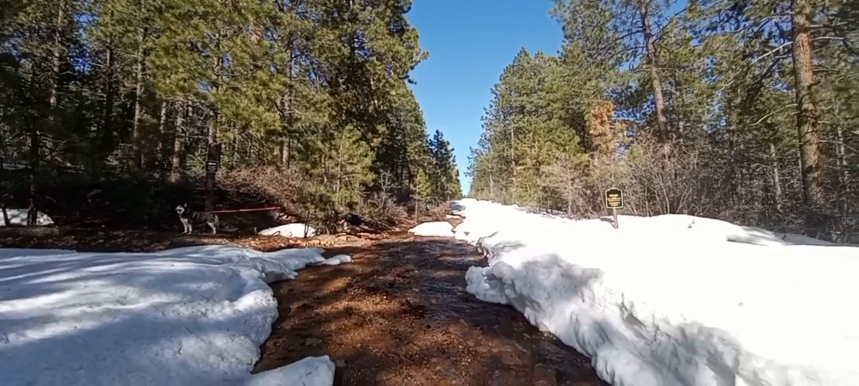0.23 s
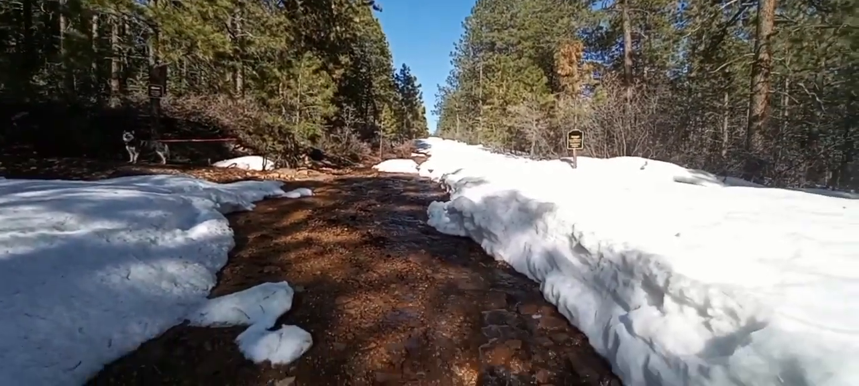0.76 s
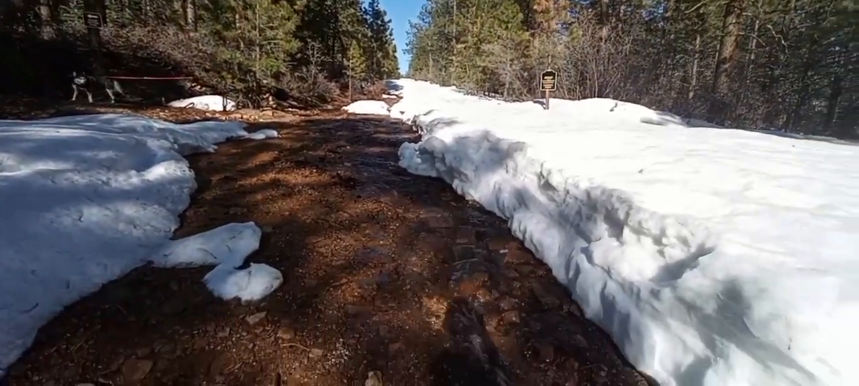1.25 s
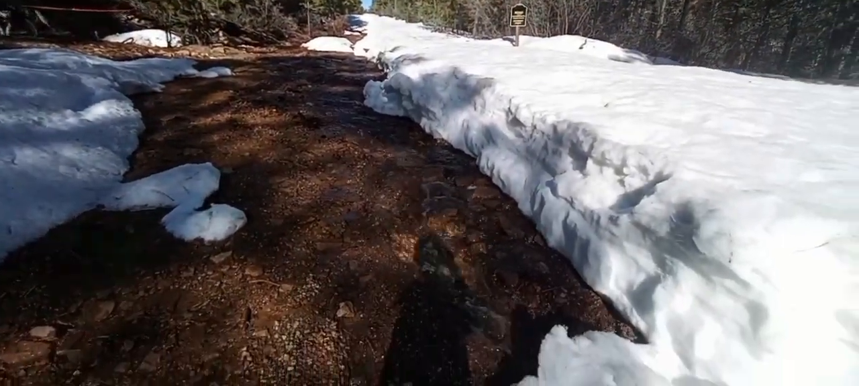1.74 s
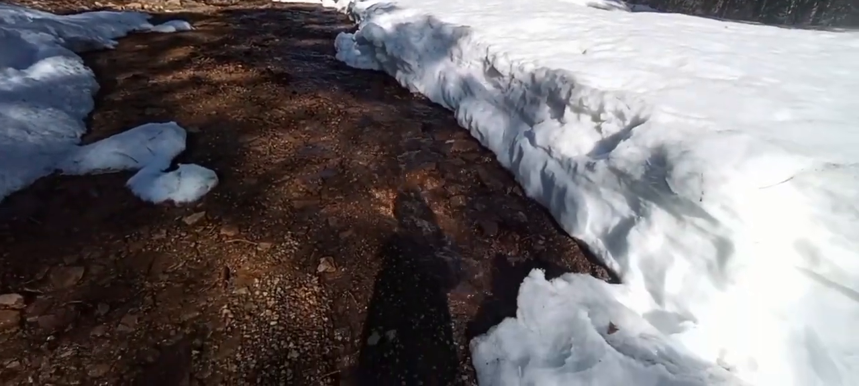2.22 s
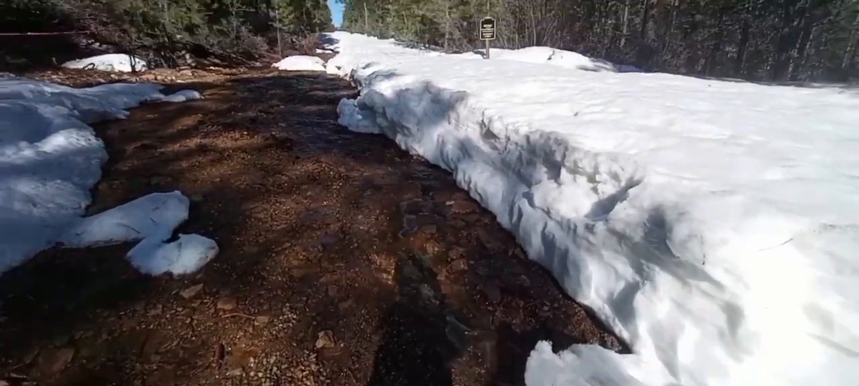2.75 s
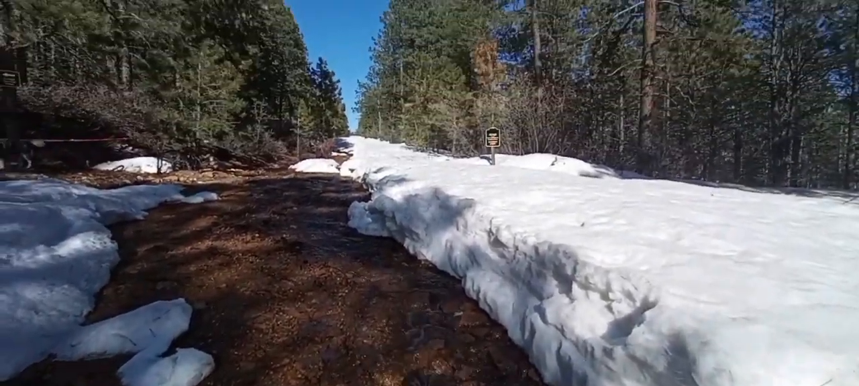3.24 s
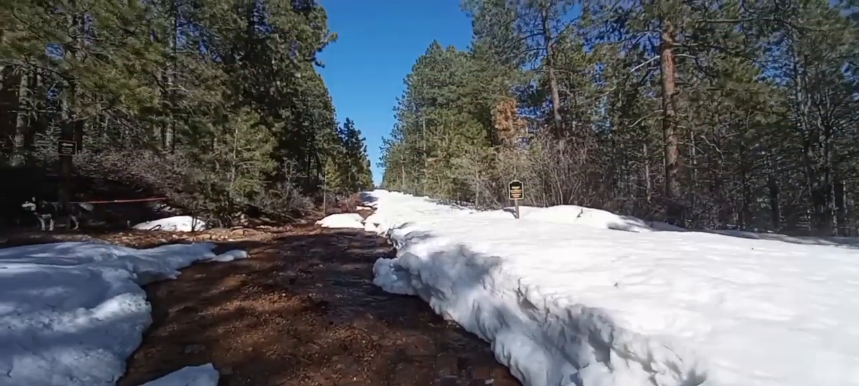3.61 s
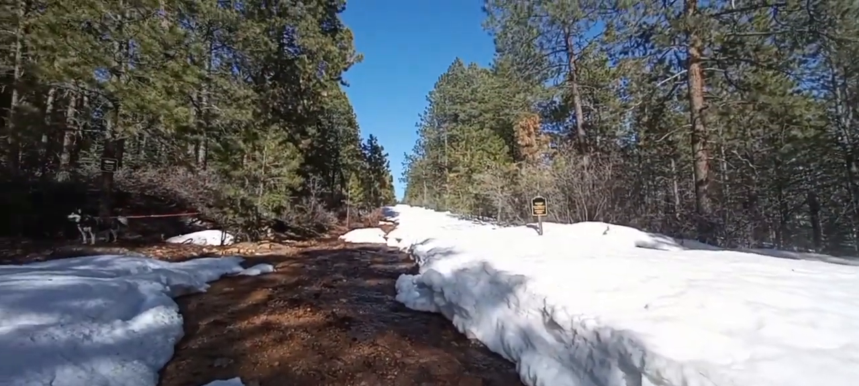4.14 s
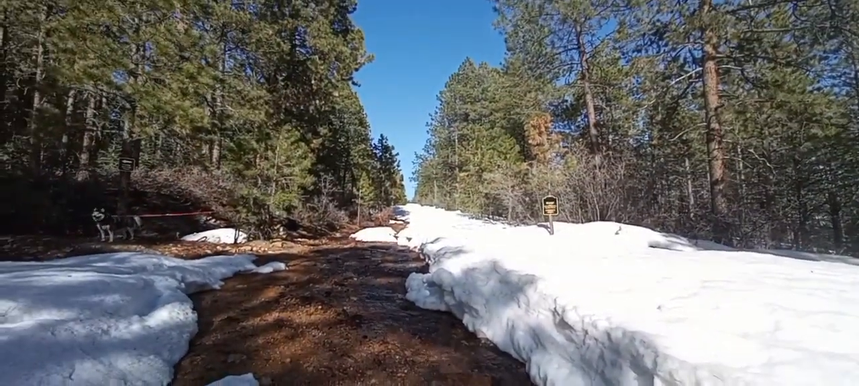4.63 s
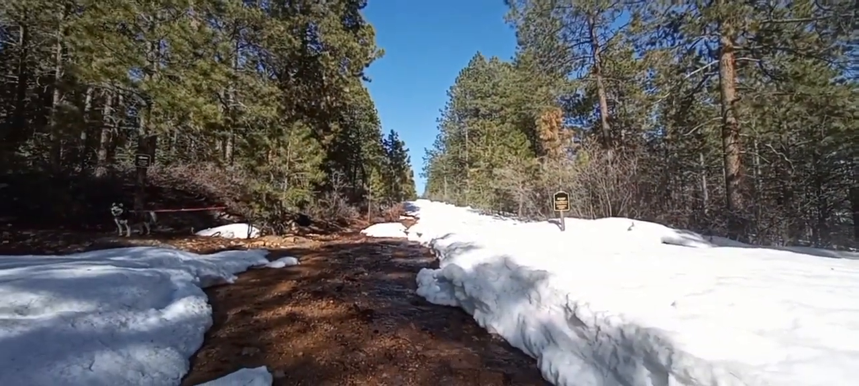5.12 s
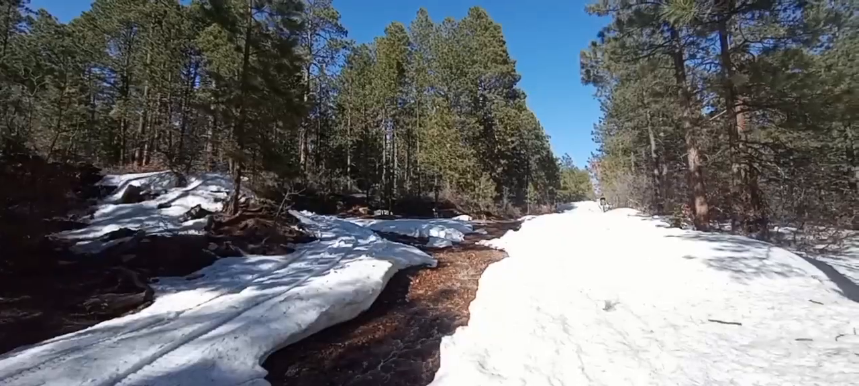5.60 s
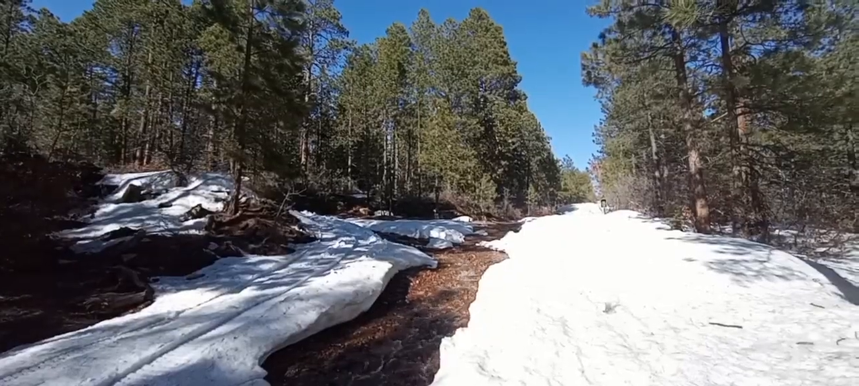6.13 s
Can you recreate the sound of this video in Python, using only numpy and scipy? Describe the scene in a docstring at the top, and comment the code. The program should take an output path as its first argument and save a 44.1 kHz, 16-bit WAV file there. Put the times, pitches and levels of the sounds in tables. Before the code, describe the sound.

Steady rushing water, close and crisp, fills the left side, with a much fainter, wider wash on the right. Small bubbles tick and pop over deeper blurred gurgles, with a few tiny bright splashes. Low wind puffs thump each side separately, heaviest around 4.3 to 4.7 seconds. After an abrupt cut and short silence, the stream rises again at another spot, gurgling more thickly.

```python
"""Snowmelt stream, two ports

Meltwater rushes over gravel between snow banks: a hiss of shaped noise and thousands of damped bubble rings,
with deeper gurgles and near pops as soft-edged gliding tones, and splashes as spits of bright noise.
A small camera hears it through two unlike microphones, the left loud and narrow, the right faint and wide;
puffs of wind thump each port alone. The sound stops dead, then fades in again at another spot on the stream."""
import sys
import numpy as np
from scipy import signal
from scipy.fft import rfft, irfft, next_fast_len
from scipy.io import wavfile
from scipy.ndimage import uniform_filter1d, map_coordinates

SR = 44100
rng = np.random.default_rng(int(sys.argv[2]) if len(sys.argv) > 2 else 0)


def pcm_store(signal):
    """Save signal as 16-bit PCM."""
    levels = np.round(np.clip(np.atleast_2d(signal), -1, 1) * 32767)
    wavfile.write(sys.argv[1], SR, levels.astype(np.int16).T)


def voltage_ratio(decibels):
    """Convert decibels (scalar or array-like) to amplitude ratios, 20 dB per decade."""
    exponent = np.asarray(decibels, float) / 20
    return 10 ** exponent


N = 280917  # samples
STOP_S, RESTART_S = 5.293, 5.692


def unit(x):
    """Scales a sound to rms 1."""
    return x / np.sqrt(np.mean(x ** 2) + 1e-20)


def along(points, hz):
    """Reads a (Hz, value) curve on a log frequency axis."""
    f, v = np.transpose(points)
    return np.interp(np.log(hz + 1), np.log(f + 1), v)


def curves(rows):
    """Draws straight-line automation, one curve for each column after the time."""
    s, *columns = np.transpose(rows)
    return [np.interp(np.arange(N) / SR, s, column) for column in columns]


def wobble(rate):
    """A smooth random curve with rate knots a second."""
    knots = rng.standard_normal(int(N * rate / SR) + 4)
    return map_coordinates(knots, [np.arange(N) * rate / SR])


def bump(s, width_s):
    """A bell in time, 1 at its middle and 1/e at width_s to either side."""
    return np.exp(-((np.arange(N) / SR - s) / width_s) ** 2)


def filtered(x, response):
    """Filters x by a (possibly complex) response of frequency."""
    m = next_fast_len(N + 8192)
    return irfft(rfft(x, m) * response(np.fft.rfftfreq(m, 1 / SR)), m)[..., :N]


def below(cut_hz, power):
    """A low-pass response, half amplitude at cut_hz."""
    return lambda hz: 1 / (1 + (hz / cut_hz) ** power)


def above(cut_hz, power):
    """A high-pass response, about half amplitude at cut_hz."""
    return lambda hz: 1 / (1 + (cut_hz / (hz + 1)) ** power)


def add(track, s, sound):
    """Adds a short sound centred on time s."""
    start = max(round(s * SR) - len(sound) // 2, 0)
    track[start:][:len(sound)] += sound


def swell(hz, ms, rise):
    """A bell-shaped tone, ms wide at half level, gliding by the share rise of its pitch over that width."""
    half = round(ms * SR / 500)
    u = np.arange(-half, half) * 1000 / (SR * ms)  # time in widths
    turns = hz * ms / 1000 * (u + rise * u ** 2 / 2)
    return np.exp(-2.77 * u ** 2) * np.sin(2 * np.pi * (turns + rng.random()))


def late(x):
    """Delays what the left microphone hears after the right."""
    lag_s = 0.001283
    return filtered(x, lambda hz: np.exp(-2j * np.pi * hz * lag_s))


def hiss(patchy_db, deep_db):
    """Far water: white noise with time-frequency patches of random gain, deeper in the low murmur."""
    hz, _, z = signal.stft(rng.standard_normal(N), SR, nperseg=512)
    patches = uniform_filter1d(rng.standard_normal(z.shape), size=6, axis=0)
    patches = uniform_filter1d(patches, size=14, axis=1)
    depth_db = patchy_db + deep_db / (1 + (hz[:, None] / 900) ** 2)
    _, sound = signal.istft(z * voltage_ratio(depth_db * unit(patches)), nperseg=512)
    return unit(sound[:N])


def bubbles(count, lo_hz, hi_hz, cycles, spread_db, size):
    """Near water: damped rings with a soft start and rising pitch, a few much louder than the rest."""
    at, pitch, luck = rng.random((count, 3)).T[:, :, None]
    hz = lo_hz + (hi_hz - lo_hz) * pitch
    u = np.arange(size) / SR * hz / cycles  # age in lives, one life being so many cycles
    gain = np.sqrt(hz) * voltage_ratio(np.minimum(-spread_db * np.log(luck), 11.5))
    ring = gain * u * np.exp(-2 * u) * np.sin(2 * np.pi * cycles * u * (1 + 0.0593 * u))
    where = (at * N).astype(int) + np.arange(size)
    return np.bincount(where.ravel(), ring.ravel(), N + size)[:N]


def water():
    """Far hiss under short small bubbles, long-ringing small bubbles and large bubbles."""
    small = bubbles(count=30000, lo_hz=1566, hi_hz=15330, cycles=3.4, spread_db=5.0, size=220)
    ringing = bubbles(count=2500, lo_hz=1402.0, hi_hz=12070, cycles=19.8, spread_db=4.5, size=1200)
    large = bubbles(count=900, lo_hz=171.2, hi_hz=1623, cycles=5.76, spread_db=1.5, size=2600)
    far = hiss(patchy_db=1.5, deep_db=3.0)
    return unit(far + 0.5 * unit(small) + 0.36 * unit(ringing) + 0.17 * unit(large))


# how alike the two microphones hear the water: f/Hz, likeness/0-1
ALIKE = [(150, 0.1), (200, 0.74), (600, 0.4), (1000, 0.23), (1450, 0.52), (2000, 0.4), (2400, 1),
         (3000, 0.39), (5300, 0.02), (7000, 0)]


def water_at_ports():
    """Part of the water reaches both microphones, the rest only one; the shared murmur swells near gurgles."""
    calm_db, swell_db, reach_s = -0.55, 6, 0.2
    likeness = lambda hz: np.clip(along(ALIKE, hz), 0, 1)
    shared = filtered(water(), lambda hz: np.sqrt(likeness(hz)))
    churn = np.tanh(sum(bump(row[0], reach_s) for row in GURGLES) / 3)  # how thickly gurgles lie
    murmur = filtered(shared, below(550, 4))
    shared = shared + (voltage_ratio(calm_db + swell_db * churn) - 1) * murmur
    left, right = [filtered(water(), lambda hz: np.sqrt(1 - likeness(hz))) for _ in "LR"]
    return left + late(shared), right + shared


# colour of the water at the left microphone, before and after the stop: f/Hz, relative level/dB
LEFT_FIRST = [(150, -17), (200, -14), (500, -15), (1150, -11), (1450, -1.5), (1900, 1), (3900, -1),
              (5300, 5.5), (6000, 2.5), (6600, -10), (7600, -28), (8500, -46), (9500, -32.5), (11000, -52),
              (15200, -46)]
LEFT_SECOND = [(200, -12), (500, -13), (1000, -11.5), (1450, -2), (1900, 1.5), (3500, -1), (5000, 1.5),
               (6300, 4.5), (7000, -7), (7700, -18), (8500, -42), (9300, -44.5), (10500, -33), (12000, -37),
               (15200, -34.5)]
# the camera swings along the stream:
# t/s, level of the left body before its top is raised or lowered/dB, aim/0 broadside to 1 end-on
CAMERA = [(0, -26.5, 0.047), (.6, -27, .15), (1.6, -27.5, 0.12), (2.0, -28, 0), (2.5, -27.5, .15),
          (3.0, -26, .8), (3.25, -26.5, .5), (3.9, -26.5, 0.91), (4.5, -27, 0.68), (5.0, -25.5, 0.63),
          (5.29, -26, 0.92), (5.7, -28.5, .3), (5.8, -26.5, .1), (5.92, -27.5, 0.37), (6.2, -29, 0.2),
          (6.37, -29, 0)]


def left_port(water_left):
    """The loud, narrow microphone: a body and a fizz split near 4.5 kHz, balanced by the camera's aim."""
    fizz_db, fizz_aim_db = -34, 7  # broadside, gain end-on
    upper_db, upper_aim_db = 3.5, -6.5  # top of the body broadside, change end-on
    body_db, aim = curves(CAMERA)
    low, thin = below(4500, 8), above(150, 5)  # thin: the water has no deep bass
    high = lambda hz: 1 - low(hz)

    def coloured(points, part):
        return unit(filtered(water_left, lambda hz: voltage_ratio(along(points, hz)) * part(hz) * thin(hz)))

    first = np.arange(N) < STOP_S * SR
    body = np.where(first, coloured(LEFT_FIRST, low), coloured(LEFT_SECOND, low))
    fizz = np.where(first, coloured(LEFT_FIRST, high), coloured(LEFT_SECOND, high))
    upper = filtered(body, above(2800, 6))
    body = body + (voltage_ratio(upper_db + upper_aim_db * aim) - 1) * upper
    flutter_db = 0.8 * wobble(11)
    return voltage_ratio(body_db) * body + voltage_ratio(fizz_db + fizz_aim_db * aim + flutter_db) * fizz


# colour of the water at the right microphone: f/Hz, relative level/dB
RIGHT_COLOUR = [(150, -22), (200, -23.5), (500, -23.5), (1150, -21.5), (1380, -17.5), (2000, -23),
                (4000, -30.5), (6500, -28), (8000, -28), (9500, -25), (11800, -33.5), (12400, -39),
                (13800, -33.5), (14300, -35.5), (15300, -29)]


def right_port(water_right):
    """The faint, wide microphone: one broad colour and a level that drifts at random."""
    thin = above(150, 5)
    wide = unit(filtered(water_right, lambda hz: voltage_ratio(along(RIGHT_COLOUR, hz)) * thin(hz)))
    return voltage_ratio(-45 + 0.7 * wobble(2.5) + 0.55 * wobble(12)) * wide


# brief lulls of the flow: t/s, level change/dB
LULLS = [(.62, -7.5), (3.803, -4.5)]


def stream():
    """The running water at both ports, rising and falling together with random surges and lulls."""
    lull_s = 0.013  # half width
    water_left, water_right = water_at_ports()
    surge_db = 0.44 * wobble(4.2) + 0.5 * wobble(22.05)
    surge_db = surge_db + sum(db * bump(s, lull_s) for s, db in LULLS)
    return voltage_ratio(surge_db) * np.array([left_port(water_left), right_port(water_right)])


# colour of the steady buffeting and of the bursts: f/Hz, relative level/dB
BUFFET = [(20, -23), (50, -10.5), (95, -3.5), (150, -9), (210, -9), (280, -35), (400, -65.5)]
BURST = [(15, -41), (45, 0), (100, 0.5), (200, 1.5), (270, -30.5), (450, -59.5)]
# rms of the buffeting between gusts, one row for left and one for right: level/dB
CALM_DB = [
    [-66.5],
    [-78],
]
# gusts added to the calm strength: middle t/s, length/s, left level/dB, right level/dB
GUSTS = [(0.88, .2, -62, -57), (1.228, 0.097, -52, -59), (1.8, 0.18, -59, -62), (2.04, 0.43, -60, -64),
         (2.237, 0.13, -75, -61), (2.58, .15, -62, -74), (3.55, 0.27, -67, -70), (4.35, 0.21, -43, -53),
         (4.65, 0.28, -45, -56), (5.117, 0.39, -63.5, -59.5), (6.3, 0.22, -63.5, -62.5)]
# wind thumps: t/s, port/0 left 1 right, f/Hz, peak level/dB, width at half level/ms
PUFFS = [(0.822, 1, 86, -34, 17), (0.881, 1, 105, -35.5, 26), (0.946, 1, 81, -43, 21),
         (0.969, 0, 75, -43, 17), (1.242, 1, 81, -45, 32), (1.244, 0, 117, -39, 32),
         (1.998, 1, 65, -43, 19), (2.54, 0, 75, -46, 25), (3.66, 1, 75, -53, 25), (4.272, 0, 99, -30, 33),
         (4.365, 1, 124, -44, 25), (4.395, 0, 92, -35, 21), (4.43, 1, 124, -37, 19),
         (4.54, 1, 126, -38.5, 28), (4.553, 0, 116, -34, 19), (4.558, 1, 81, -37, 21),
         (4.597, 1, 108, -43, 30), (4.6, 0, 81, -42.5, 42), (4.659, 0, 102, -35, 14),
         (4.692, 0, 102, -30, 12), (4.795, 1, 97, -48, 20), (4.911, 1, 70, -47.5, 33),
         (5.056, 1, 65.3, -46, 18), (5.178, 1, 86, -50.5, 30), (5.274, 1, 75.6, -43, 21)]


def wind():
    """Lumpy low noise, unrelated between the ports; each falling thump lets a burst of broad rumble through."""
    noise = rng.standard_normal((2, 2, N))
    rumble = filtered(noise[0], lambda hz: voltage_ratio(along(BUFFET, hz)))
    broad = unit(filtered(noise[1], lambda hz: voltage_ratio(along(BURST, hz))))
    lumpy = unit(rumble * voltage_ratio(4.5 * np.array([wobble(14), wobble(14.5)])))
    thumps, gate = np.zeros((2, 2, N + SR))
    for s, port, hz, db, ms in PUFFS:
        add(thumps[round(port)], s, voltage_ratio(db) * swell(hz, ms, rise=-0.27))
        add(gate[round(port)], s, voltage_ratio(db - 12) * np.hanning(round(4.3 * ms * SR / 1000)))
    strength = voltage_ratio(CALM_DB)
    for s, length, left_db, right_db in GUSTS:
        strength = strength + voltage_ratio([[left_db], [right_db]]) * bump(s, length / 2)
    return strength * lumpy + thumps[:, :N] + gate[:, :N] * broad


# big bubbles: t/s, f/Hz, peak level of the main tone at the left port/dB, width at half level/ms
GURGLES = [(0.039, 258, -39.5, 25), (0.43, 900, -43, 40), (0.476, 176, -41.5, 21), (0.862, 490, -43, 15),
           (1.266, 215, -39, 22), (1.312, 274, -41, 16), (1.36, 233, -37.5, 32), (1.387, 987, -36, 21),
           (1.654, 327, -37, 28), (1.71, 329, -42, 100), (1.804, 187, -38, 27), (1.863, 442, -41, 19),
           (1.99, 370, -39, 30), (2.345, 254, -35, 13), (2.534, 187, -38, 14), (2.593, 257, -39.5, 64),
           (2.622, 267, -30, 13), (3.496, 210, -38, 15), (3.76, 230, -45.5, 30), (4.55, 200, -38, 25),
           (4.551, 872, -42, 42), (4.775, 185, -38.5, 24), (5.78, 251, -34.5, 32), (5.8, 803, -43, 180),
           (5.86, 546, -35.5, 23), (5.871, 1200, -33.5, 43), (5.96, 800, -43, 67), (5.97, 512, -42.5, 48),
           (5.985, 307, -39.5, 23), (6.04, 1465, -36, 22), (6.151, 387, -39.5, 55), (6.184, 230, -30.5, 23),
           (6.31, 367, -41, 22)]


def gurgles():
    """Trapped air escapes as low bubbles; each comes in a close cluster, so the note blurs and beats."""
    track = np.zeros(N + SR)
    blur = rng.normal(0, 1, (len(GURGLES), 2, 2))  # two mates each: detune and slip
    for (s, hz, db, ms), mates in zip(GURGLES, blur):
        add(track, s, voltage_ratio(db) * swell(hz, ms, rise=0.056))
        for detune, slip in mates:
            mate = swell(hz * (1 + 0.073 * detune), 0.55 * ms, rise=0.05)
            add(track, s + 0.012 * slip, voltage_ratio(db - 3.5) * mate)
    track = track[:N]
    return np.array([late(track), voltage_ratio(-8.5) * track])


# bursting bubbles close by: t/s, peak level at the left port/dB, f/Hz
POPS = [(0.605, -15, 3730), (0.648, -16, 3280), (0.947, -15.5, 4760), (1.7736, -16, 5300),
        (2.739, -11.5, 5100), (3.6062, -12.5, 5800), (3.7198, -12.5, 5300), (3.7918, -12.5, 5600),
        (3.936, -16, 5050), (4.0575, -13, 5390), (4.435, -10, 5600), (4.5066, -15.5, 5100),
        (4.798, -13.5, 6000), (4.826, -13, 2670), (5.846, -15.5, 3000), (5.906, -16, 4100),
        (6.001, -17.5, 2970), (6.049, -20, 1810), (6.183, -19.5, 1850), (6.235, -13, 5940),
        (6.2553, -12, 6000)]


def pops():
    """The nearest small bubbles burst beside the left microphone, each a rising tone 7.5 cycles wide."""
    track = np.zeros(N + SR)
    for s, db, hz in POPS:
        add(track, s, voltage_ratio(db) * swell(hz, 7500 / hz, rise=0.14))
    return track[:N] * voltage_ratio([[0], [-26]])


# small sharp splashes: t/s, starting level at the right port before the high-pass/dB, left minus right/dB
SPLASHES = [(0.7627, -31, -19.5), (0.8944, -35, -16), (1.4052, -35, -16), (3.7194, -43, -5.5),
            (4.0906, -39, -17.5), (6.2372, -34, -0.5)]


def splashes():
    """Short bright spits of noise that die by 60 dB in 16 ms, high-passed near 6.5 kHz."""
    track, t = np.zeros((2, N + SR)), np.arange(600) / SR
    for s, db, pan_db in SPLASHES:
        spit = voltage_ratio(db - 60 * t / 0.016) * rng.standard_normal((2, len(t)))
        track[:, round(s * SR):][:, :len(t)] += spit * voltage_ratio([[pan_db], [0]])
    return filtered(track[:, :N], above(6500, 6))


def scene():
    """Water and wind at the two ports."""
    return stream() + wind() + gurgles() + pops() + splashes()


def low_pass(x):
    """Removes everything above the highest recorded frequency."""
    return signal.sosfilt(signal.butter(12, 16580, fs=SR, output="sos"), x)


def record(dry):
    """A band limit at 15.5 kHz, an abrupt stop, a silence and a straight fade-in."""
    fade_s = 0.3  # time the ramp would need from zero to full
    t = np.arange(N) / SR
    stop = voltage_ratio(-np.clip(t - STOP_S, 0, 1) * 7500 - 19 * (t > STOP_S))  # a 19 dB drop, then 7.5 dB per ms
    fade = np.clip((t - RESTART_S) / fade_s + 0.058, 0, 1)  # starts a little above zero
    limited = filtered(dry, lambda hz: hz < 15500)
    return low_pass(limited * np.where(t < RESTART_S, stop, fade))


dry = scene()
out = record(dry)
pcm_store(out)
```